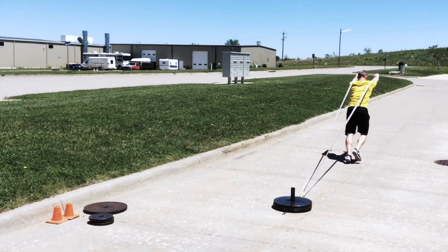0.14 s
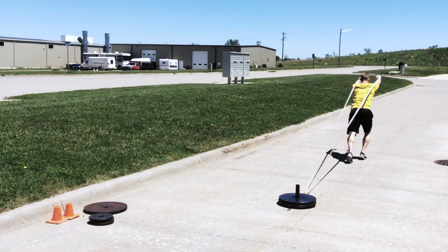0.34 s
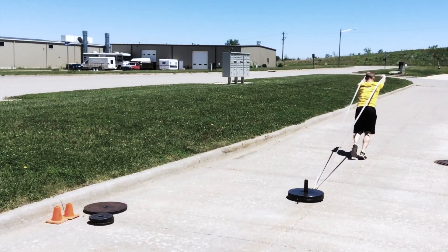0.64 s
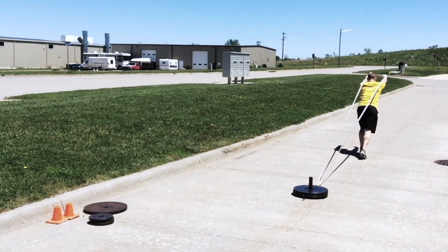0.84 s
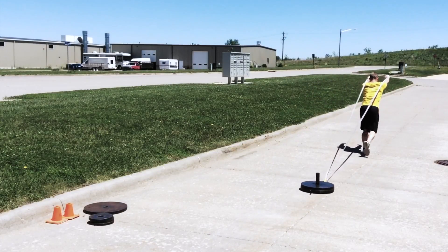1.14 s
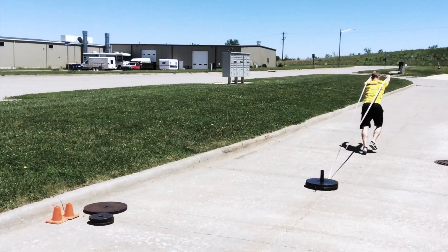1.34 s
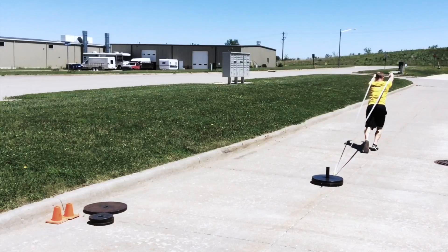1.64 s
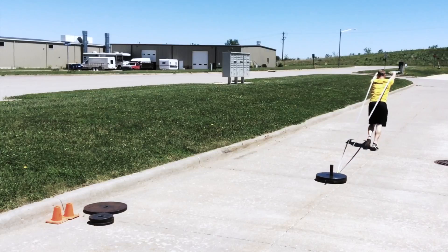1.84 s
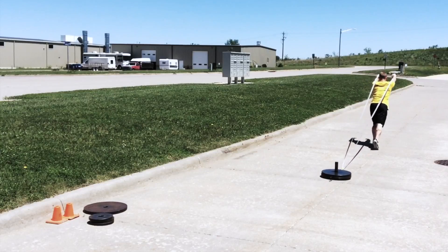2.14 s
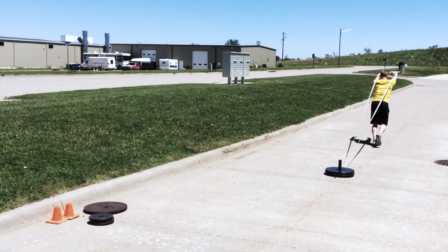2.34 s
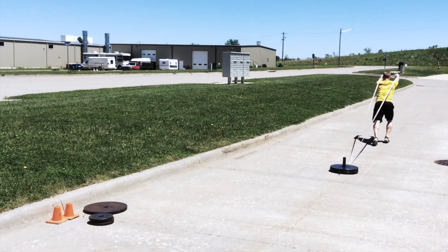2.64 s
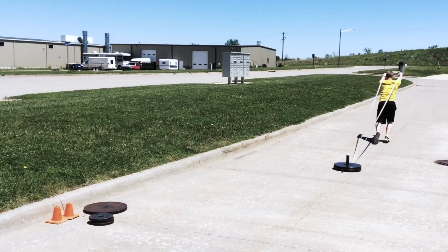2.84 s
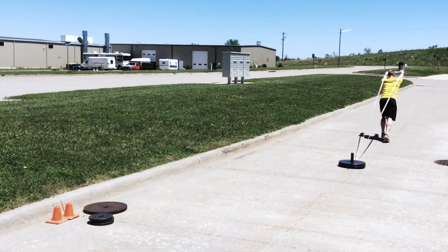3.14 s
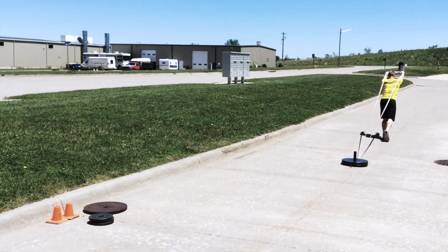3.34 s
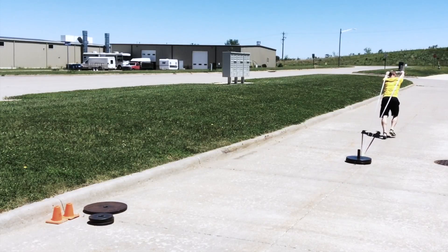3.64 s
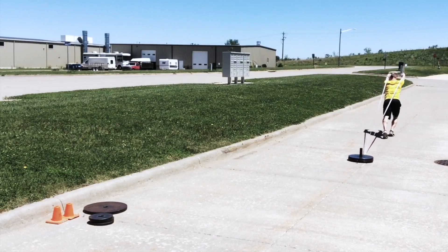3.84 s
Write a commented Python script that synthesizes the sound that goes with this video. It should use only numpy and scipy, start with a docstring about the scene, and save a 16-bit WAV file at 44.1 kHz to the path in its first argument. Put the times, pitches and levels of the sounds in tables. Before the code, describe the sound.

A weighted metal sled is dragged along a concrete drive outdoors with a steady gritty hiss, small stone snaps, pings and dull knocks. Low wind rumbles throughout, and gusts thump the microphone midway and again near the end.

```python
"""A gritty hiss over rumbling wind: a weighted metal sled is dragged away along a concrete drive.
Grit crushed under it hisses through the steel pan, stones snap and ping, and the load knocks and
judders over rough spots. The wind buffets and thumps the microphone; the hardest gusts pin it at
its limit, choking the scrape for a few hundredths of a second."""
import sys
import numpy as np
from scipy import signal
from scipy.fft import rfft, irfft, next_fast_len
from scipy.io import wavfile
from scipy.ndimage import uniform_filter1d, map_coordinates

SR = 44100
rng = np.random.default_rng(int(sys.argv[2]) if len(sys.argv) > 2 else 0)


def dump(signal):
    """Clip the signal to [-1, 1] and save it as 16-bit WAV at the path in sys.argv[1]."""
    limited = np.clip(np.atleast_2d(signal).T, -1, 1)
    pcm = np.round(limited * 32767).astype(np.int16)
    wavfile.write(sys.argv[1], SR, pcm)


N = 176400


def amp(db):
    """Decibels to gain."""
    return 10 ** (np.asarray(db) / 20)


def unit(x):
    """Scale to rms 1."""
    return x / np.sqrt(np.mean(x ** 2) + 1e-20)


def clock():
    """Time of each sample."""
    return np.arange(N) / SR


def curves(rows):
    """One automation curve for each column after the time."""
    times, *columns = np.transpose(rows)
    return [np.interp(clock(), times, column) for column in columns]


def wobble(rate):
    """A smooth random curve, rate knots a second."""
    return map_coordinates(rng.standard_normal(2000), [clock() * rate], mode="mirror")


def filtered(x, response):
    """Filter x by a gain given as a function of frequency."""
    size = next_fast_len(N + SR // 2)
    return irfft(rfft(x, size) * response(np.fft.rfftfreq(size, 1 / SR)), size)[:N]


def coloured(x, eq):
    """x through an EQ curve of (Hz, dB) points, at rms 1."""
    hz, db = np.transpose(eq)
    return unit(filtered(x, lambda f: amp(np.interp(np.log(f + 1), np.log(hz + 1), db))))


# Swells of the buffeting and of the flutter, before soft limiting (time [s], level [dB])
BUFFET_LEVELS = [(0, -35.5), (.35, -39), (.48, -34.5), (.62, -38.5), (1.25, -45), (1.4, -39.5),
                 (1.7, -31.5), (1.97, -25.5), (2.2, -35.5), (2.32, -29), (2.5, -40.5), (2.75, -29),
                 (2.95, -31), (3.3, -36.5), (3.5, -31.5), (3.75, -31), (4, -26.5)]
FLUTTER_LEVELS = [(0, -60), (1.3, -96), (1.4, -48), (1.7, -43), (1.97, -55), (2.08, -56.5), (2.95, -70),
                  (3.12, -38), (3.22, -52.5), (3.32, -39.5), (3.45, -52), (4, -73)]
# Low-end tone of each (frequency [Hz], gain [dB])
BUFFET_EQ = [(1.5, -1.5), (4, -.5), (8, -1.5), (16, -17), (30, -22.5), (60, -40), (120, -59), (250, -92),
             (600, -105)]
FLUTTER_EQ = [(12, -21), (30, 0.5), (60, -5), (110, -24.5), (200, -29.5), (500, -63)]
MIC_LIMIT = 0.079  # amplitude at which a gust pins the microphone


def wind():
    """Slow pushes of air on the microphone, with a faster flutter in the gusts, softly limited."""
    (buffet_db,), (flutter_db,) = curves(BUFFET_LEVELS), curves(FLUTTER_LEVELS)
    buffet = amp(buffet_db) * coloured(rng.standard_normal(N), BUFFET_EQ)
    flutter = amp(flutter_db) * coloured(rng.standard_normal(N), FLUTTER_EQ)
    return 1.67 * MIC_LIMIT * np.tanh((buffet + flutter) / (1.157 * MIC_LIMIT))


# Eddies hitting the microphone (time [s], peak [dB], half-length [s])
EDDIES = [(0.46, -28.5, 0.023), (1.402, -43.5, 0.0031), (1.469, -43, 0.003), (1.571, -25.5, 0.015),
          (1.674, -39, 0.0039), (1.722, -28.5, 0.011), (1.768, -37, 0.0066), (1.815, -46, 0.0029),
          (1.824, -44.5, 0.0021), (1.872, -37.5, 0.0053), (1.966, -30, 0.0082), (1.993, -45.5, 0.0029),
          (3.118, -42.5, 0.003), (3.314, -26.5, 0.0089), (3.323, -38.5, 0.0032), (3.329, -36, 0.006),
          (3.376, -45, 0.0031), (3.492, -38.5, 0.0063), (3.597, -37.5, 0.0063)]


def thumps():
    """Each eddy is one quick push and pull of air."""
    out = np.zeros(N)
    for sign, (time, db, half_length) in zip(rng.choice([-1, 1], len(EDDIES)), EDDIES):
        x = (clock() - time) / half_length
        out += sign * amp(db) * np.sqrt(2 * np.e) * x * np.exp(-x ** 2)
    return out


def sizzle(centre_hz, width_hz=640):
    """The narrow, very high hiss of an overloaded input."""
    noise = rng.standard_normal(N)
    return unit(filtered(noise, lambda f: 1 / (1 + ((f - centre_hz) / width_hz) ** 2) ** 0.43))


# The hardest gusts
# (start [s], end [s], push direction [+/-1], ducking [dB], sizzle level [dB], sizzle pitch [Hz])
PINNING_GUSTS = [(1.374, 1.401, 1, 21, -63.5, 15300), (1.441, 1.4604, 1, 27, -61.5, 15000),
                 (1.52, 1.544, -1, 30.5, -104, 14600), (1.685, 1.7, -1, 35.5, -104, 14700),
                 (1.768, 1.811, 1, 30, -65.5, 15200), (1.832, 1.869, -1, 35, -101, 14200),
                 (2.033, 2.103, -1, 39, -66, 12800), (3.074, 3.1, 1, 10.5, -64, 14900),
                 (3.119, 3.136, -1, 30, -94, 14500), (3.29, 3.295, 1, 9, -61, 14900),
                 (3.327, 3.334, 1, 20, -62, 14900), (3.385, 3.403, -1, 33, -98, 14500),
                 (3.551, 3.593, -1, 22, -65.5, 13200)]
PUSH_S, CHOKE_S, RECOVER_S = 0.024, 0.0049, 0.0013  # glide of the push; attack, release of the duck


def overload(sled, air):
    """Mix sled and air; each listed gust pins the microphone, chokes the sled and adds a thin sizzle."""
    t = clock()
    for start, end, direction, duck_db, sizzle_db, sizzle_hz in PINNING_GUSTS:
        outside_s = np.maximum(np.maximum(start - t, t - end), 0)
        pinned = np.exp(-(outside_s / PUSH_S) ** 2 - outside_s / PUSH_S)
        choked = np.clip(1 - outside_s / np.where(t < start, CHOKE_S, RECOVER_S), 0, 1)
        air = air + pinned * (np.sign(direction) * MIC_LIMIT - air)
        duck = 1 - (1 - amp(-duck_db)) * choked
        sled = sled * duck + amp(sizzle_db) * choked * sizzle(sizzle_hz)
    return sled + air


def struck(modes, time, level_db, attack_cycles=0.54):
    """Struck steel: decaying modes whose levels and phases vary from hit to hit."""
    out, t = np.zeros(N + SR), np.arange(SR // 4) / SR
    hz, db, t60 = np.transpose(modes)[:, :, None]
    gain = amp(np.reshape(level_db, (-1, 1)) + db + rng.normal(0, 1, hz.shape))
    ring = gain * amp(-60 * t / t60) * np.sin(2 * np.pi * (hz * t + rng.random(hz.shape)))
    attack = 1 - np.exp(-t * hz / attack_cycles)
    out[round(time * SR):][:len(t)] = (ring * attack).sum(0)
    return out[:N]


# Blows of the load on the pan (time [s], level [dB], upper-mode gain [dB])
LOAD_KNOCKS = [(0.142, -53, -15), (.657, -52, -3.5), (1.051, -58.5, 11), (1.314, -51, -1.5),
               (1.87, -49, -4), (1.914, -47.5, -6), (1.949, -52.5, -5), (2.2885, -43.5, -1),
               (2.52, -51, -0.5), (3.657, -55, -4.5), (3.907, -51, -13)]
# Body of the loaded sled (frequency [Hz], gain [dB], t60 [s])
SLED_MODES = [(190, -5, .09), (238, -0.5, 0.086), (286, -6.5, 0.016), (356, -12.5, 0.13), (630, 2, 0.027),
              (880, -14, 0.061), (979, -3, .07), (1244, -4, 0.078), (1315, -10, 0.029)]


def knocks(upper_hz=500):
    """A dull blow of the load rings the sled's low modes."""
    is_upper = np.transpose(SLED_MODES)[0] > upper_hz
    return sum(struck(SLED_MODES, time, db + upper_db * is_upper) for time, db, upper_db in LOAD_KNOCKS)


# Metallic peaks of the pan (frequency [Hz], bandwidth [Hz], boost [dB])
PAN_RESONANCES = [(357, 8.3, 7), (954, 58, 7.5), (1230, 60, 4), (1388, 34, 4), (2444, 104, 3.5),
                  (2800, 140, 2), (3110, 370, 2.5), (3810, 150, 3), (4950, 99, 1.5), (7740, 170, 2.5),
                  (8600, 390, 2.5)]


def steel(x):
    """Ring x through the resonances of the steel pan."""
    return filtered(x, lambda f: 1 + sum(
        (amp(db) - 1) * 1j * f * width / (hz * hz - f * f + 1j * f * width)
        for hz, width, db in PAN_RESONANCES))


def grit(per_s, share, spread_db=2.5):
    """Tiny fractures of random size over smooth rubbing; share is their part of the power."""
    clicks = (rng.random(N) < per_s / SR) * rng.choice([-1, 1], N)
    sizes = amp(spread_db * np.minimum(rng.standard_normal(N), 2.5))
    return np.sqrt(share) * unit(clicks * sizes) + np.sqrt(1 - share) * rng.standard_normal(N)


# Rough spots in the drive (time [s], thud level [dB], clatter level [dB], half-length [s])
ROUGH_SPOTS = [(0.527, -67, -62, 0.0089), (0.686, -61.5, -68, 0.027), (1.069, -63.5, -58.5, 0.037),
               (1.189, -75, -61.5, 0.026), (1.338, -63, -64, 0.036), (1.914, -64, -58.5, 0.019),
               (1.988, -59, -65, 0.022), (2.291, -70.5, -52, 0.022), (2.323, -63.5, -63, 0.041),
               (3.73, -68, -71, 0.011), (3.855, -65, -77, 0.0063), (3.92, -61.5, -66, 0.026)]
# Boomy thud and midrange clatter (frequency [Hz], gain [dB])
THUD_EQ = [(90, -57), (150, 5.5), (230, 4), (300, -2), (420, -15), (900, -44)]
CLATTER_EQ = [(200, -50), (450, -4), (650, 7), (1000, 3), (1350, 2.5), (1900, 0.5), (2500, 1.5),
              (3500, -9.5), (8000, -31)]


def judders():
    """The load rattles in short swells; the same jolts make a thud and a clatter."""
    t = clock()
    swells = np.array([np.exp(-np.abs((t - time) / half) ** 2.3) for time, _, _, half in ROUGH_SPOTS])
    _, thud_db, clatter_db, _ = np.transpose(ROUGH_SPOTS)
    jolts = steel(grit(per_s=640, share=0.44))
    thud = amp(thud_db) @ swells * coloured(jolts, THUD_EQ)
    clatter = amp(clatter_db) @ swells * coloured(jolts, CLATTER_EQ)
    return thud + clatter


# Stones breaking under the pan (time [s], crack level [dB], ping level [dB])
STONE_SNAPS = [(0.073, -49, -47), (.116, -46, -59), (0.2043, -43.5, -38), (0.264, -50, -54),
               (0.296, -50, -59), (0.508, -41.5, -40), (0.8692, -48, -64), (0.897, -47.5, -63),
               (0.9864, -51.5, -58), (1.08, -49, -65), (1.296, -47, -53), (1.304, -54, -60),
               (1.663, -56, -44.5), (1.7548, -44, -44.5), (1.98, -51, -58), (2.173, -49, -50),
               (2.432, -51, -50), (2.898, -52.5, -62), (3.598, -52, -63)]
# Bright tone of a crack (frequency [Hz], gain [dB])
CRACK_EQ = [(500, -21), (1500, -6), (2500, 0), (3200, 2), (4100, -2.5), (5100, 0), (6200, -7), (8000, -1.5),
            (9200, -2), (10500, -13), (15000, -17)]
# High modes that a stone rings in the pan (frequency [Hz], gain [dB], t60 [s])
PAN_PING_MODES = [(970, -15.5, 0.086), (2533, -7.5, 0.048), (3070, -6, .045), (7570, -8, 0.019),
                  (8400, -13, 0.028)]


def snaps(hold_s=0.00099, t60_s=0.034):
    """A stone cracks in a short burst and leaves a ping in the pan."""
    t = clock()
    envelope = sum((t >= time) * amp(db - 60 * np.maximum(t - time - hold_s, 0) / t60_s)
                   for time, db, _ in STONE_SNAPS)
    cracks = envelope * coloured(rng.standard_normal(N), CRACK_EQ)
    pings = sum(struck(PAN_PING_MODES, time, db) for time, _, db in STONE_SNAPS)
    return cracks + pings


def patchy(x, depth_db):
    """Narrow resonances come and go as the points of contact shift."""
    spectrum = signal.stft(x, nperseg=1024)[2]
    patches = uniform_filter1d(rng.standard_normal(spectrum.shape), size=3, axis=0)  # across frequency
    patches = uniform_filter1d(patches, size=9, axis=1)  # along time
    return signal.istft(spectrum * amp(depth_db * unit(patches)), nperseg=1024)[1][:N]


# Fader moves of the scrape, before trims (time [s], hiss [dB], ring [dB], treble [dB])
SCRAPE_LEVELS = [(0, -51, -58, -56.5), (.1, -52.5, -63.5, -54), (.28, -52.5, -61.5, -55.5),
                 (.42, -56, -65.5, -60.5), (.68, -50.5, -65.5, -54.5), (.84, -53, -63.5, -56.5),
                 (.95, -55, -65, -57.5), (1.1, -55, -60, -58), (1.3, -52, -60.5, -56),
                 (1.45, -55.5, -67, -58.5), (1.62, -57.5, -63, -63), (1.82, -55, -61, -58),
                 (1.9, -57, -56, -60), (2, -57, -61.5, -57), (2.17, -54.5, -63, -57.5),
                 (2.4, -55, -66, -58), (2.78, -58, -64.5, -60.5), (2.91, -56, -66, -58),
                 (3.32, -59.5, -66.5, -61), (3.48, -57, -65, -57.5), (3.72, -56.5, -66.5, -59.5),
                 (3.92, -57.5, -58.5, -63)]
# Tone of each layer (frequency [Hz], gain [dB])
HISS_EQ = [(300, -15), (800, -9), (1500, -7), (2000, -4.5), (2450, -2), (3200, -3), (4200, -3),
           (5400, -2.5), (6100, -8.5), (7500, -9.5), (15000, -34.5)]
RING_EQ = [(150, -11.5), (230, -0.5), (420, -7.5), (640, -0.5), (790, -16), (1000, -7.5), (1300, -0.5),
           (1700, -1), (2300, -5.5), (5000, -26)]
TREBLE_EQ = [(4000, -27.5), (6200, -12.5), (6800, -6.5), (8400, -1.5), (9450, -4), (9950, -10),
             (12000, -14.5), (14200, -14.5), (15400, -29)]
CHATTER_DB, CHATTER_PER_S = 1.5, 45  # uneven sliding, shared by all layers


def scrape():
    """Crushed grit drives the pan: a hiss, a low ring and a bright treble."""
    def layer(level_db, eq, trim_db, patchy_db):
        grinding = steel(grit(per_s=2200, share=0.55))
        return amp(level_db + trim_db) * coloured(patchy(grinding, patchy_db), eq)

    hiss_db, ring_db, treble_db = curves(SCRAPE_LEVELS)
    hiss = layer(hiss_db, HISS_EQ, trim_db=-3, patchy_db=2)
    ring = layer(ring_db, RING_EQ, trim_db=-1.5, patchy_db=5)
    treble = layer(treble_db, TREBLE_EQ, trim_db=-4, patchy_db=3)
    return (hiss + ring + treble) * amp(CHATTER_DB * wobble(CHATTER_PER_S))


def scene():
    """Sled and wind share one overloading microphone, with the thumps on top, in mono."""
    sled = scrape() + snaps() + judders() + knocks()
    return (overload(sled, wind()) + thumps())[None]


def record(dry):
    """A steep high cut takes off the very top."""
    high_cut = signal.ellip(12, .1, 90, 15490, fs=SR, output="sos")
    return signal.sosfiltfilt(high_cut, dry, axis=-1)


dry = scene()
out = record(dry)
dump(out)
```